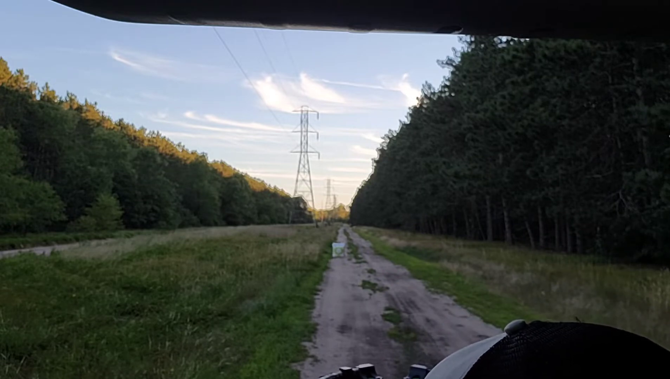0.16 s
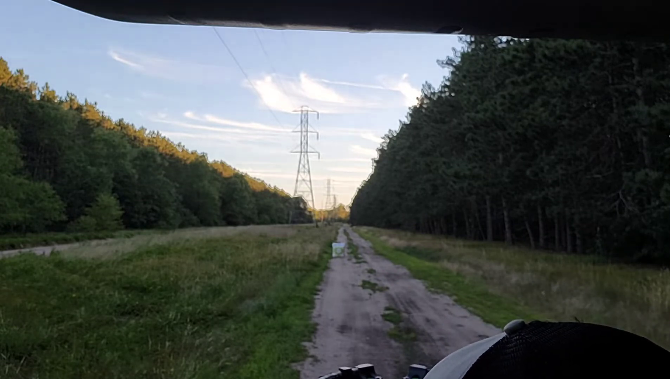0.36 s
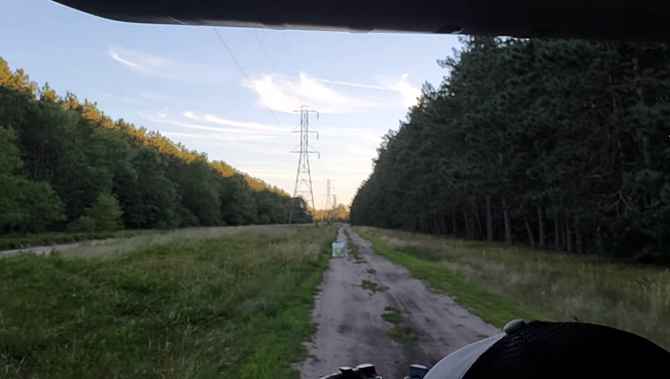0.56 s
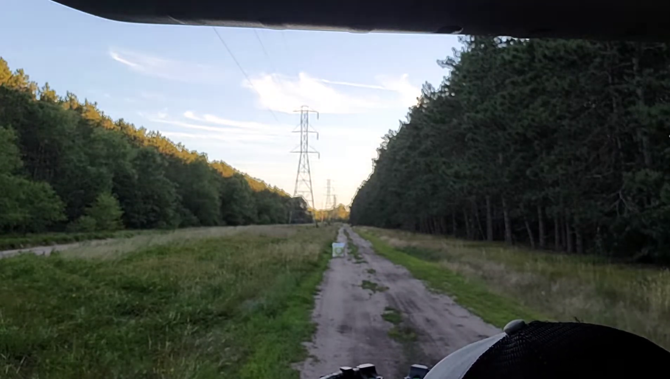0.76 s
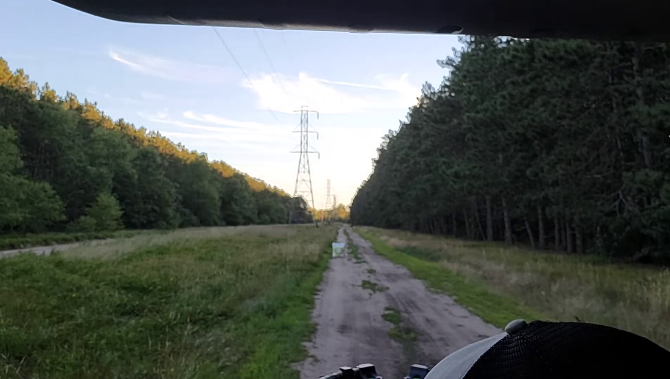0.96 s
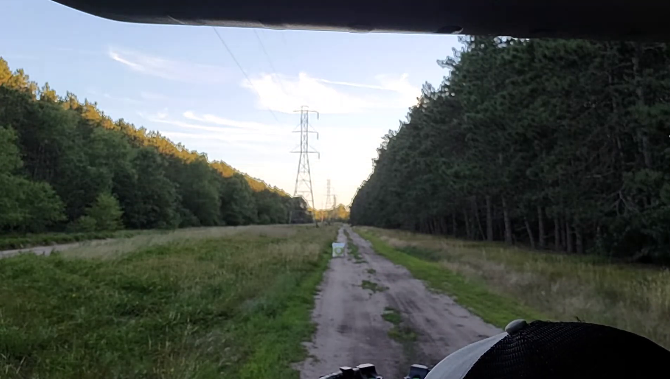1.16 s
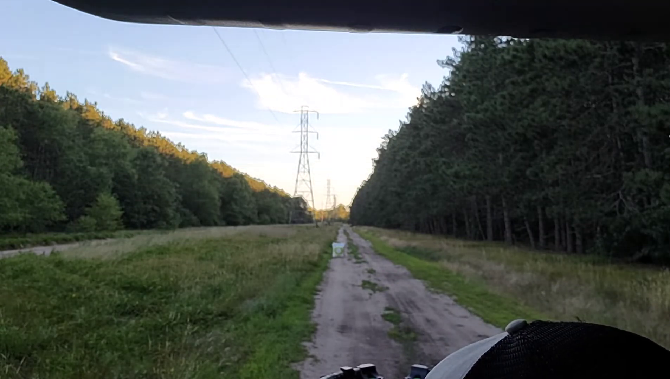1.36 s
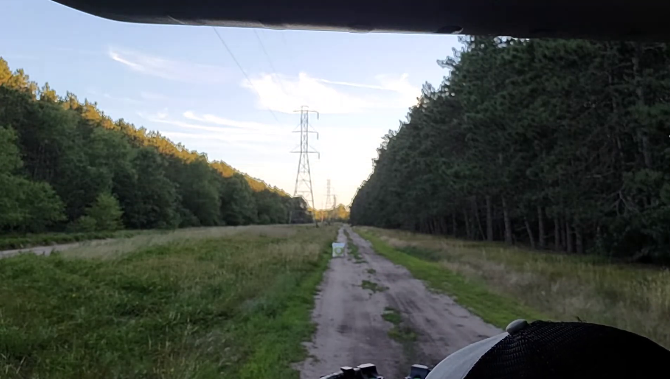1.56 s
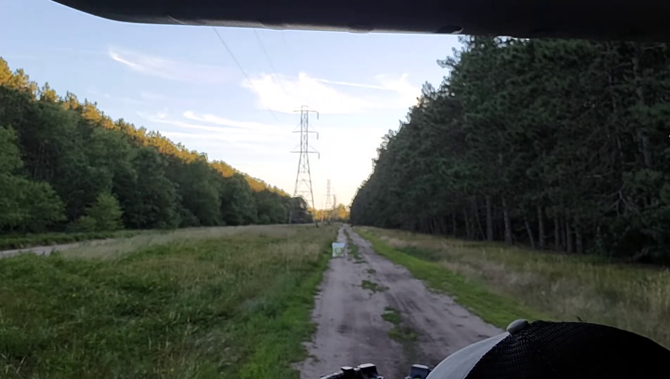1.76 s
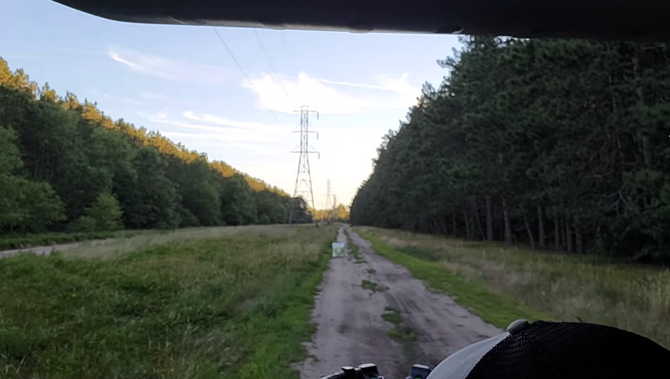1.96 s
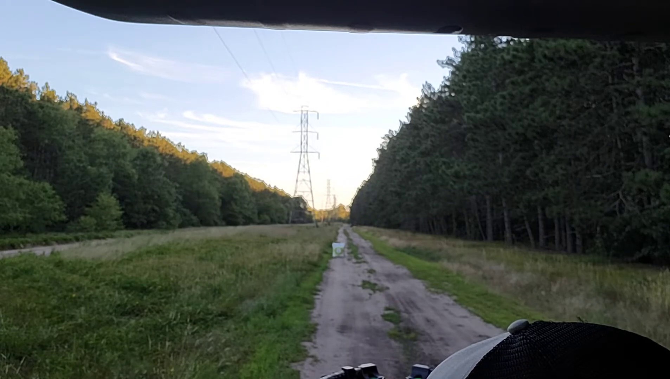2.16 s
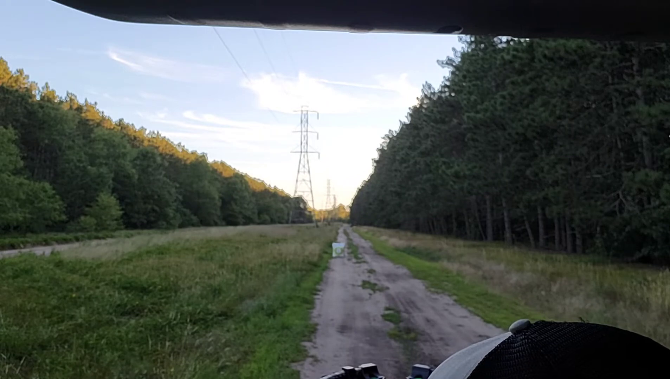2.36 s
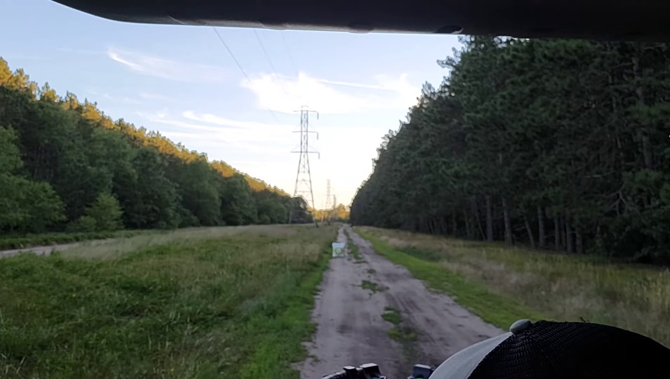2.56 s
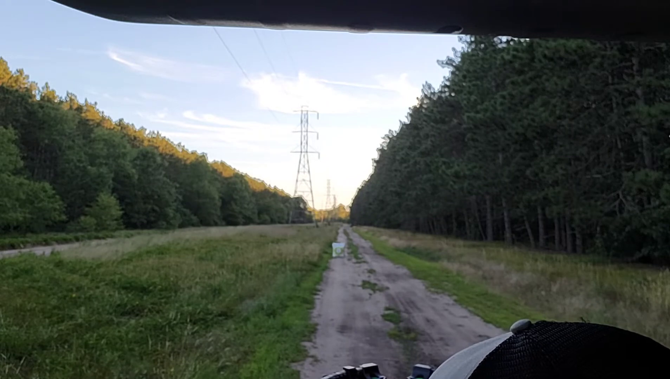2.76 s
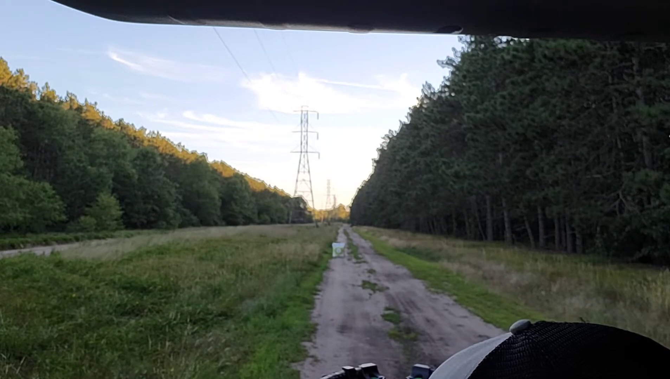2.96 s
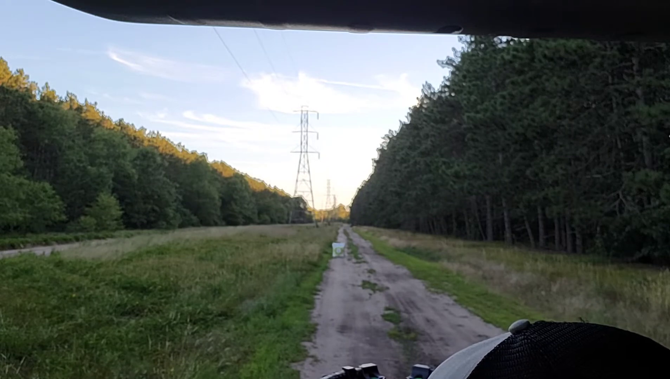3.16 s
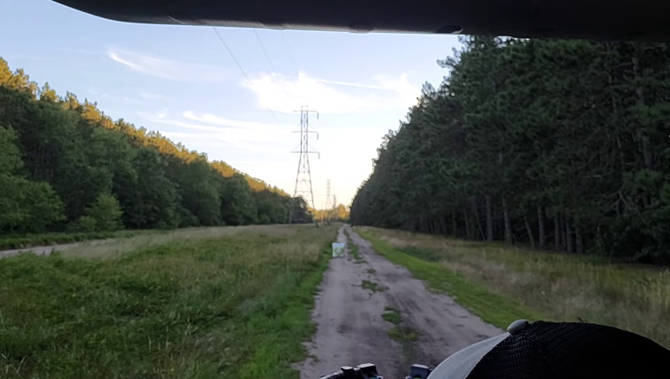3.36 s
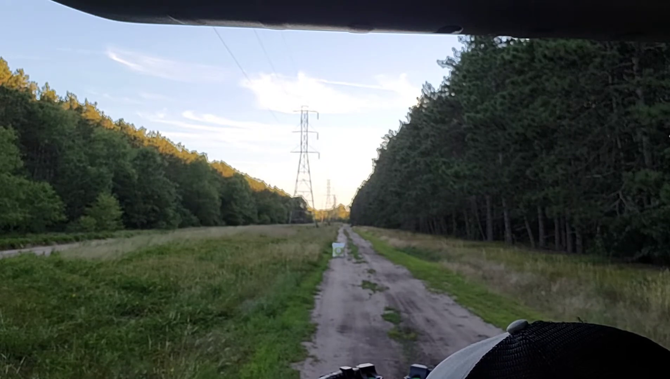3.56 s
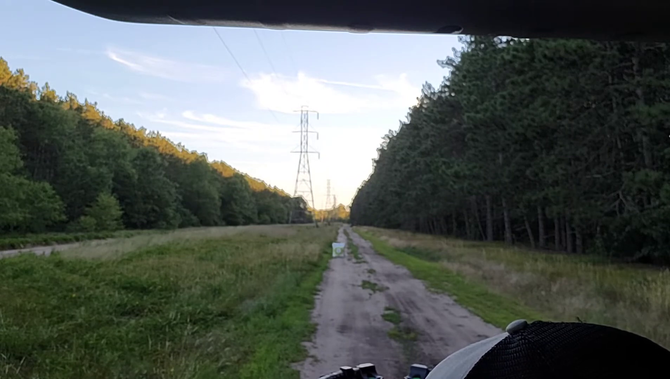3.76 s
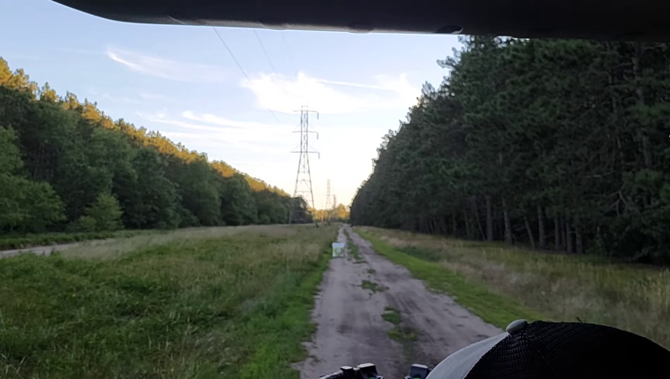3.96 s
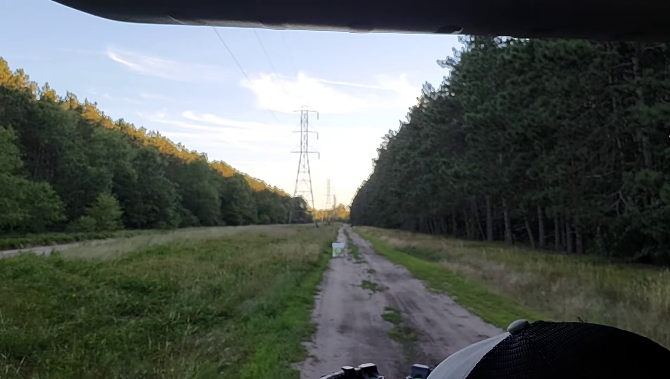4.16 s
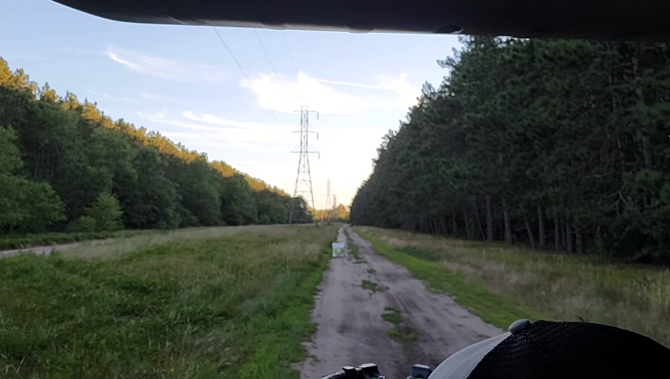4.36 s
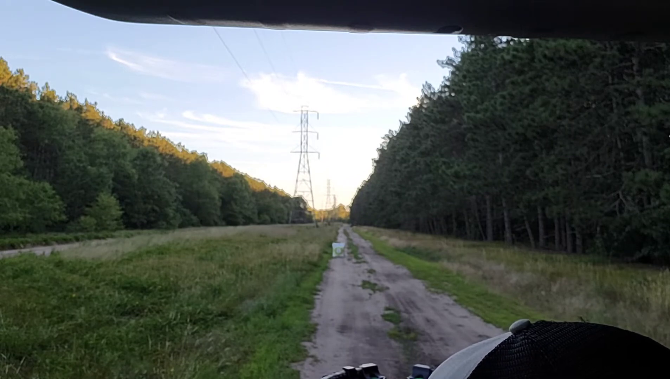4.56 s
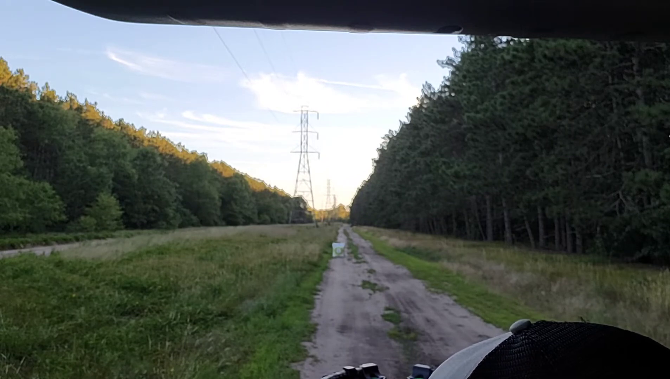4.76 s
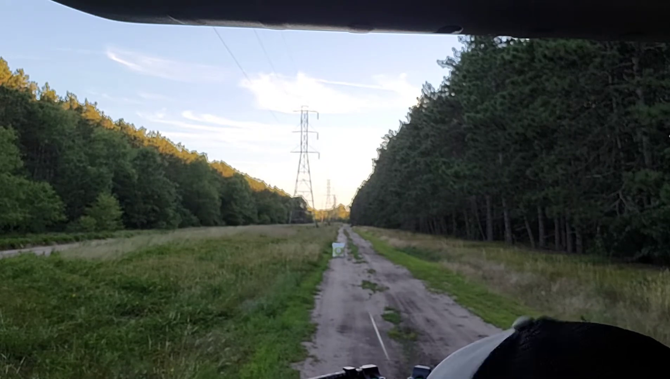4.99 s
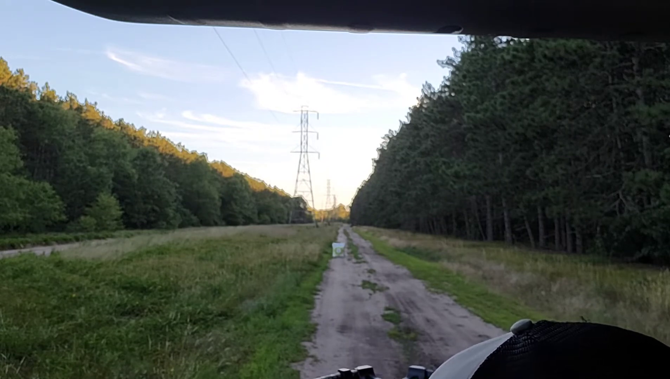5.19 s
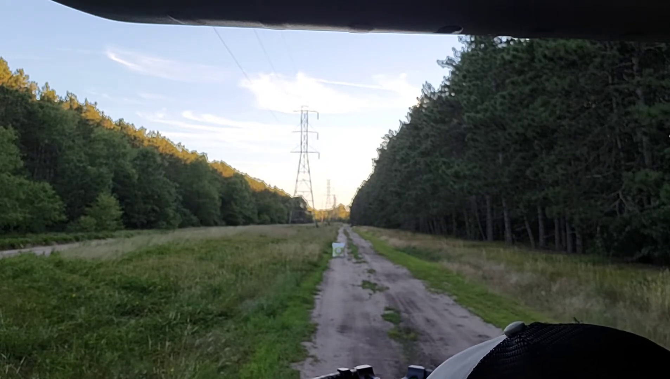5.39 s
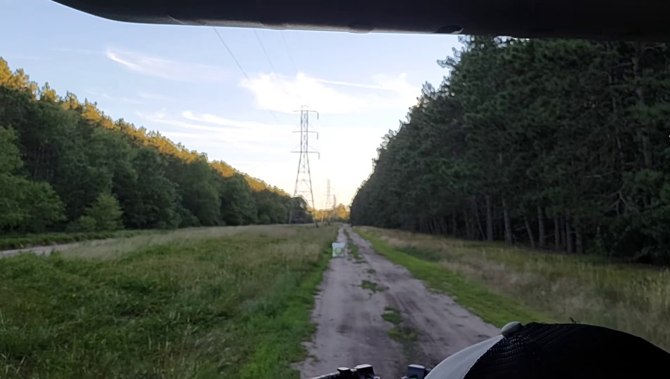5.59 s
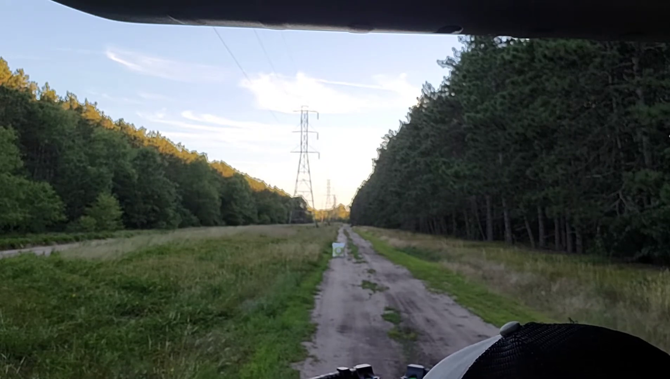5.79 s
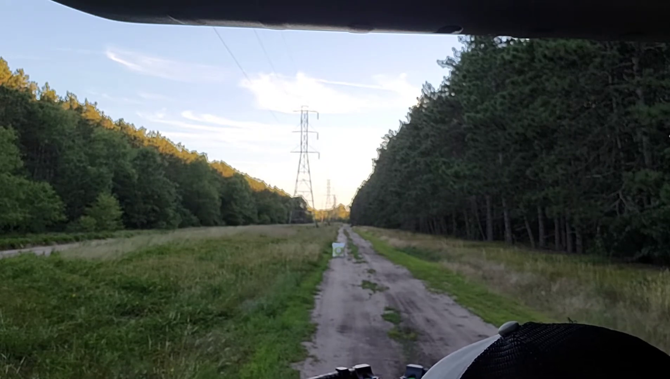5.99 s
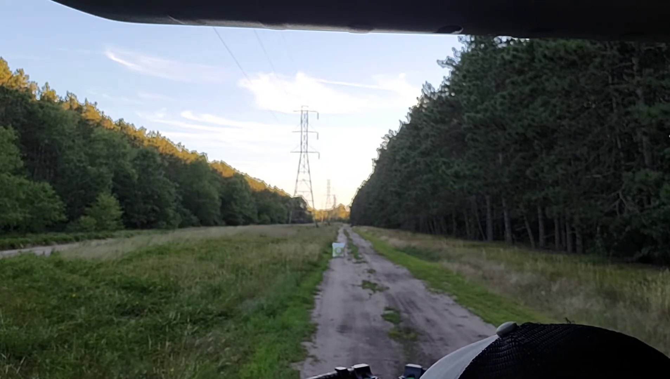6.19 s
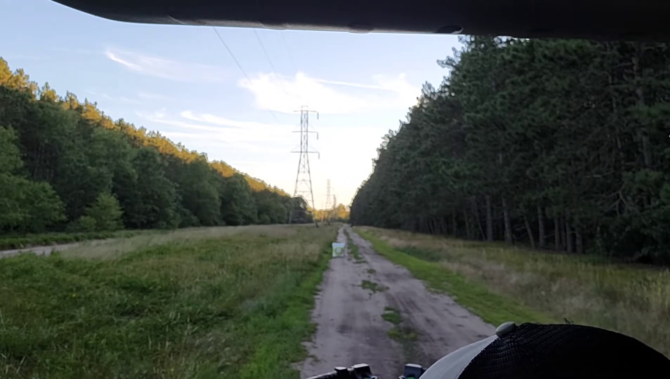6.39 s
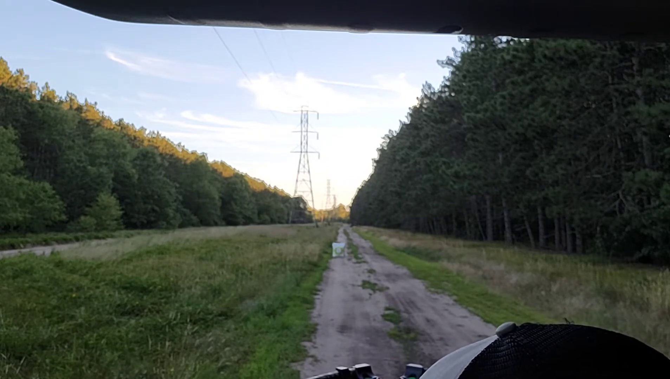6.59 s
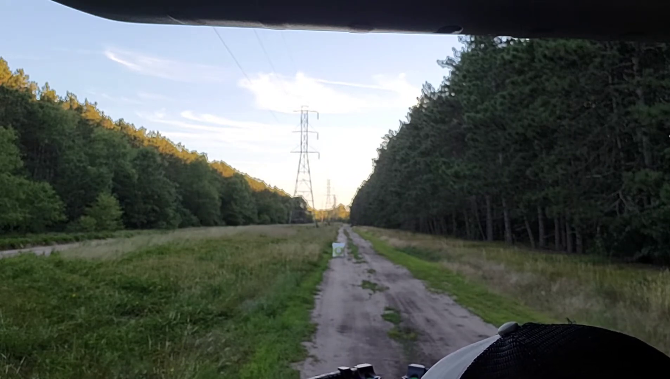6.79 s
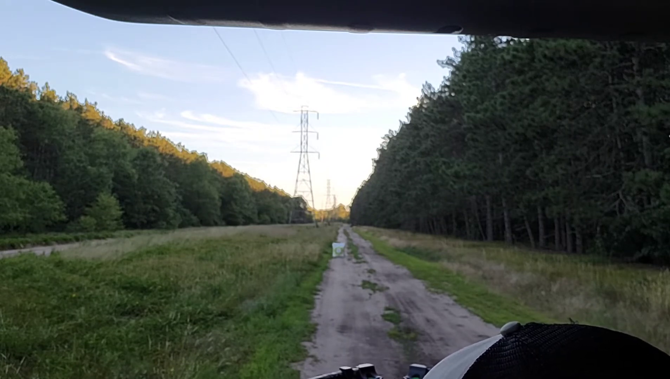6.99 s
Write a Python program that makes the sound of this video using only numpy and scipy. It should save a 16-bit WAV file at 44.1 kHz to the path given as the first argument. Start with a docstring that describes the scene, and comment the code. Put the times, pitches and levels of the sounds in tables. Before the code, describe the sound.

From the start, a parked off-road vehicle's two-cylinder engine idles outdoors, a low, puffing throb with a light metallic drone and valve clatter. It stays fairly quiet and wavers in strength, with a brief rasp at the opening and a few short ringing tones in the first second and a half. A cricket gives faint, high chirps at irregular intervals over a soft low rumble. Two tiny dry ticks come at about 2 and 4.2 seconds.

At 5 seconds a crossbow fires close by: a very loud, bright crack with a short twang and a slight thump. At about 5.3 seconds the bolt hits its target with a fainter, sharp click and splintery knock. Both cracks echo through the trees and fade over about a second. The background dips at the shot and creeps back after 6 seconds, with one more faint chirp near 6.8 seconds.

```python
"""On a sandy track between two walls of forest, a crossbow is shot from a parked off-road vehicle.
The two-cylinder engine idles, puffing through its exhaust and rattling, while a cricket rubs its wings.
About five seconds in, the string cracks against its stops. The bolt strikes 0.3 s later, and the trees
scatter both cracks back. An automatic volume control dips at the shot, waits a second and creeps back."""
import sys
import numpy as np
from scipy import signal
from scipy.fft import rfft, irfft, next_fast_len
from scipy.io import wavfile
from scipy.ndimage import uniform_filter1d, minimum_filter1d

SR = 44100
rng = np.random.default_rng(int(sys.argv[2]) if len(sys.argv) > 2 else 0)


def digitize_waveform(pressure):
    """Quantize a signal to 16-bit integers and store it at the path in sys.argv[1].

    Rows of a 2-D input are taken as channels; values are limited to [-1, 1].
    """
    field = np.atleast_2d(pressure).T
    bounded = np.clip(field, -1, 1)
    quanta = np.round(bounded * 32767).astype(np.int16)
    wavfile.write(sys.argv[1], SR, quanta)


N = 310196
TIME = np.arange(N) / SR
LEFT_RIGHT = np.array([[.5], [-.5]])   # shares a level gap: half up on the left, half down on the right

# The two microphones. Each row: frequency in Hz, how alike they sound (1 = same), left minus right in dB.
MICROPHONES = [(30.2, 0.45, 1), (90, 1, 2.5), (300, 0.92, 0.96), (693, 0.76, 2.5), (1280, 0.2, 6.5),
               (2330, 0.067, 1.5), (4350, 0.22, 0.9), (8050, .1, -0.5), (14000, 0.23, -2)]


def from_db(db):
    """Turn decibels (dB) into a number to multiply a sound by."""
    return 10 ** (np.asarray(db) / 20)


def rms_one(x):
    """Scale a sound so that its average strength (rms) is one."""
    return x / np.sqrt(np.mean(x ** 2) + 1e-20)


def at_hz(table, hz, column=1):
    """Read a table between its frequencies, giving every octave equal room."""
    rows = np.array(table, float)
    return np.interp(np.log(np.maximum(hz, 1)), np.log(rows[:, 0]), rows[:, column])


def over_time(curve):
    """Join rows of (seconds, value) with straight lines, one value for each sample."""
    return np.interp(TIME, *np.transpose(curve))


def decay(start, t60):
    """Jump to one at the start, then fade by 60 dB every t60 seconds."""
    age = TIME - start
    return (age >= 0) * 1000. ** -np.clip(age / t60, 0, 10)


def add(out, x, start):
    """Mix a short sound in at a start time in seconds."""
    at = round(start * SR)
    x = x[..., max(-at, 0):N - at]
    out[..., max(at, 0):max(at, 0) + x.shape[-1]] += x


def noise(tone, size=N):
    """Stereo noise with a given tone; left and right are alike in the bass, much less so in the treble."""
    padded = next_fast_len(size, True)
    hz = np.fft.rfftfreq(padded, 1 / SR)
    shared, opposite = rfft(rng.standard_normal((2, padded)))
    alike = np.clip(at_hz(MICROPHONES, hz), -1, 1)
    pair = np.sqrt(1 + alike) * shared + np.sqrt(1 - alike) * opposite * [[1], [-1]]
    return rms_one(irfft(pair * from_db(at_hz(tone, hz)), padded)[:, :size])


def knock(tone, size=8192):
    """The shortest sudden pulse that has a given tone."""
    log_gain = np.log(from_db(at_hz(tone, np.fft.rfftfreq(size, 1 / SR))))
    cepstrum = irfft(log_gain)   # folding this onto its first half packs the energy at the start
    cepstrum[1:size // 2] *= 2
    cepstrum[size // 2 + 1:] = 0
    return irfft(np.exp(rfft(cepstrum)))


def puff(tone, size=8192):
    """A smooth push of air with a given tone, rising the same way as it falls."""
    gain = from_db(at_hz(tone, np.fft.rfftfreq(size, 1 / SR)))
    return np.roll(irfft(gain), size // 2)


def repeat(firings, sound, mode="full"):
    """Play the same sound at every firing of the engine."""
    return rms_one(signal.fftconvolve(firings, sound, mode)[:N])


def cylinders(first_s=.0098, second_at=.575, second_db=-2.5, wobble_db=.6, jitter_s=.00015):
    """One spike for each firing: the second cylinder is weaker and fires just past mid-cycle."""
    # The idle sags very slightly. Each row: time in seconds, engine cycles per second.
    idle_speed = [(0, 23.535), (1.4, 23.515), (2.2, 23.44), (3.3, 23.335), (7, 23.32)]
    cycles = np.cumsum(over_time(idle_speed)) / SR
    firings = np.zeros(N)
    for phase, db in ((0, 0), (second_at, second_db)):
        due_s = np.interp(np.arange(phase, cycles[-1]), cycles, TIME)
        late, strong = rng.standard_normal((len(due_s), 2)).T
        at = ((first_s + due_s + jitter_s * late) * SR).astype(int)
        firings[np.clip(at, 0, N - 1)] = from_db(db + wobble_db * strong)
    return firings


def exhaust(firings, throb):
    """Each firing puffs gas through the muffler (a boom) and the pipe (a bark); both ring and rumble."""
    # The tone of each part. Each row: frequency in Hz, relative level in dB.
    muffler_tone = [(20, -37), (47, -17), (70, -9.5), (95, 2.5), (120, 2), (145, 7.5), (165, -5.5),
                    (200, -25.5), (3000, -115)]
    pipe_tone = [(80, -45.5), (185, -13.5), (215, 3.5), (240, 2), (280, -12), (330, -10), (400, -20.5),
                 (700, -50.5), (3000, -100)]
    # How loud each part is. Each row: time in seconds, level in dB.
    boom_level = [(0.0, -42), (1.23, -47), (1.45, -45), (2.35, -50.5), (2.74, -43.5), (3.26, -42),
                  (3.71, -43.5), (3.78, -51.5), (3.93, -46), (4.48, -45.5), (4.9, -51), (6.9, -46)]
    bark_level = [(0.0, -43.5), (0.18, -40), (0.93, -50.5), (2.37, -55), (2.59, -47.5), (3.04, -52.5),
                  (3.41, -44.5), (3.97, -58.5), (4.35, -49.5), (4.9, -52), (6.9, -50.5)]

    def blown(tone, loudness, ringing, rumble):
        puffs = repeat(firings, -puff(tone), "same")
        sound = puffs + ringing * repeat(firings, knock(tone)) + rumble * throb * noise(tone)
        return from_db(over_time(loudness)) * rms_one(sound)

    boom = blown(muffler_tone, boom_level, ringing=.21, rumble=.24)
    return boom + blown(pipe_tone, bark_level, ringing=.39, rumble=.51)


def opening_rasp(throb, rise_s=.017, sag_db_per_s=40, fade_from_s=.2):
    """A brief rasp that throbs with the engine as it swells, sags and dies away."""
    # The rasp's tone. Each row: frequency in Hz, relative level in dB.
    rasp_tone = [(700, -23), (1000, 2.5), (1400, -1.5), (1900, -8.5), (2200, -26), (6000, -59)]
    swell = np.minimum(TIME / rise_s, 1) * from_db(-55 - sag_db_per_s * TIME)
    fade = (TIME < fade_from_s) + decay(fade_from_s, t60=.38)
    return swell * fade * throb * noise(rasp_tone)


def case_and_valves(firings, throb):
    """Each firing shakes the metal: the engine case drones and the valves clatter."""
    # The tone of each part. Each row: frequency in Hz, relative level in dB.
    case_tone = [(250, -35), (420, -25.5), (490, -2), (520, -4), (555, 5), (590, -5), (655, -2.5),
                 (770, -26), (1100, -33), (3000, -88.5)]
    valve_tone = [(500, -32), (850, -4.5), (1020, 10), (1200, -8), (1400, -6), (1550, -16.5), (1750, -13),
                  (2300, -26), (6000, -73)]
    # How loud each part is. Each row: time in seconds, level in dB.
    case_level = [(0.0, -55.5), (0.61, -54.5), (1.18, -55.5), (1.45, -50.5), (1.65, -53), (2.77, -57),
                  (3.29, -51.5), (4.9, -60.5), (6.9, -60.5)]
    valve_level = [(0.35, -67.5), (0.41, -74.5), (1.67, -72.5), (2.81, -75.5), (3.35, -65), (4.01, -80),
                   (4.9, -74), (6.9, -83.5)]

    def shaken(tone, loudness, rough):
        sound = repeat(firings, -knock(tone)) + rough * throb * noise(tone)
        return from_db(over_time(loudness)) * rms_one(sound)

    return shaken(case_tone, case_level, rough=1.5) + shaken(valve_tone, valve_level, rough=1.4)


def case_singing(swell_s=.042):
    """Now and then the engine case sings out one short note."""
    # The notes. Each row: loudest moment in seconds, pitch in Hz, level in dB.
    notes = [(.55, 570, -47.5), (.695, 541, -52.5), (.955, 565, -51), (1.49, 656, -56), (1.55, 533, -51.5),
             (3.3, 560, -56.5)]
    out = np.zeros(N)
    for peak_s, hz, db in notes:
        age = TIME - peak_s
        out += from_db(db) * np.exp(-(age / swell_s) ** 2) * np.sin(2 * np.pi * hz * age)
    return np.sqrt(2) * out


def engine():
    """The firings drive the exhaust and shake the metal; the rough noises throb in step with them."""
    firings = cylinders()
    shake = np.convolve(decay(0, t60=.2)[:SR // 4], np.hanning(SR // 300))   # a jolt with a soft edge
    throb = repeat(firings, shake)
    return exhaust(firings, throb) + opening_rasp(throb) + case_and_valves(firings, throb) + case_singing()


def cricket(wing_hz=4790, step_hz=25, rise_hz=90, step_db=5, stroke_s=.05, gap_s=.046):
    """Three raspy wing strokes a chirp, each louder and a little higher; the trees throw them back."""
    # The chirps. Each row: time in seconds, level in dB that the strokes climb toward.
    chirps = [(-.10, -58.5), (0.632, -65), (1.176, -65), (1.908, -65.5), (2.283, -63.5), (3.279, -64.5),
              (4.005, -64), (4.405, -63.5), (6.793, -65)]
    out = np.zeros((2, N))
    along = np.linspace(0, 1, int(stroke_s * SR))
    for chirp_s, db in chirps:
        for k in range(3):
            hz = wing_hz + step_hz * k + rise_hz * (along - .5) + rng.normal(0, 12)
            stroke = np.sin(np.pi * along) ** 2 * np.sin(2 * np.pi * np.cumsum(hz) / SR)
            add(out, from_db(db + step_db * (k - 3)) * stroke, chirp_s + k * gap_s - stroke_s / 2)
    scrape = noise([(3500, -31.5), (4400, -8), (4800, 6), (5300, -7.5), (6500, -34.5)])
    out += from_db(-4) * np.abs(signal.hilbert(out)) * scrape   # the scrape follows each stroke's loudness
    trees = forest_echo(delay_s=.0029, spread_s=.08, tilt_db_per_octave=-3)
    trees *= decay(0, t60=1.4)[:trees.shape[1]]
    echo = from_db(-25) * signal.fftconvolve(out, trees, axes=1)[:, :N]
    add(echo, from_db(-14) * out, start=.095)   # one clear bounce off the forest edge
    return out + echo


def forest_echo(delay_s, spread_s, tilt_db_per_octave, size=65536):
    """The echo of one crack: far trunks answer more weakly, and the air takes the treble first."""
    # Sound scattered by the trees. Each row: frequency in Hz, relative level in dB, t60 in seconds.
    bands = [(200, -2, 1.6), (590, 6, 1.6), (840, -3, 2.4), (2100, 0.5, 2.82), (2700, 1, 1.7),
             (3300, 0, 1.3), (4360, -4, 1.05), (6220, -3, .84), (7640, 3, .85), (8705, -11.5, .88),
             (13150, -2, .55), (16000, -4, .35)]
    # The nearer wall of trees is on the right. Each row: frequency in Hz, left minus right in dB.
    lean = [(600, 0), (1200, -4), (5000, 0.5), (13000, -6)]
    age = np.maximum(TIME[:size] - delay_s, 0)
    spreading = (1 - np.exp(-age / .008)) / (1 + age / spread_s)
    hz = np.fft.rfftfreq(size, 1 / SR)
    white = rfft(noise([(20, 0), (20000, 0)], size))
    echo = 0
    for k, (centre_hz, db, t60) in enumerate(bands):
        band = at_hz([(row[0], j == k) for j, row in enumerate(bands)], hz)   # 1 here, 0 at the others
        tilt_db = tilt_db_per_octave * np.log2(centre_hz / 4000)
        gain = from_db(db + tilt_db + at_hz(lean, centre_hz) * LEFT_RIGHT)
        echo += gain * irfft(white * band) * 1000. ** (-age / t60)
    return echo * spreading


def air():
    """A faint, steady background of low rumble and hiss."""
    # The background's tone. Each row: frequency in Hz, relative level in dB.
    air_tone = [(31, 24), (45, 48), (65, 39), (270, 37.5), (800, 14), (2000, -2), (6000, -7), (7500, -5.5),
                (9000, -8), (16000, 0)]
    return from_db(-55.5) * noise(air_tone)


def handling():
    """Handling makes two tiny dry ticks."""
    # The ticks. Each row: start in seconds, level in dB.
    ticks = [(1.995, -68), (4.161, -65)]
    return sum(from_db(db) * decay(start, t60=.015) for start, db in ticks) * noise([(5000, 2), (15000, -3)])


def crossbow(release_s=5.0268, slide_s=.0075, recoil_s=5.04, recoil_hz=60.4, lean_left_db=1):
    """The string rasps along the rail, slams into its stops and rebounds; the recoil thumps the stock."""
    # The string hits its stops, then bounces. Each row: start in seconds, rasp in dB,
    # blow to the bow's limbs (its springy arms) in dB, brightness of that blow in Hz.
    contacts = [(5.0348, -1.5, -4, 2197), (5.0384, -2.5, -11, 4000), (5.0427, 1, -17, 2000),
                (5.052, -11, -19, 600), (5.0572, -17, -18, 600.2)]
    # The tone of the string's rasp. Each row: frequency in Hz, relative level in dB.
    snap_tone = [(88, -36), (160, -26), (450, -2.5), (589, 0), (854, -18), (1020, -7.5), (1480, -9),
                 (1950, -1), (2350, -8.5), (2800, -11), (3900, -5), (5460, -11.5), (7400, -1.5),
                 (9260, -18.5), (13800, -1.5), (16000, -20)]
    # The notes of the limbs and stock. Each row: pitch in Hz, relative level in dB, t60 in seconds.
    limb_notes = [(208, -9, .11), (310, -4, 0.07), (355, -3, .07), (420.2, -8, 0.069), (569.6, -5, .07),
                  (790, -21, .06), (1030, -9, .05), (1260, -15, .05), (1700, -7, .045), (1978, -9, .05),
                  (2320, -12, .035)]
    along_rail = np.clip((TIME - release_s) / slide_s, 0, 1)
    rasp = np.sqrt(np.abs(np.sin(np.pi * along_rail)))
    for start, rasp_db, _, _ in contacts:
        buzz = from_db(-22) * decay(start, t60=.14)
        rasp += from_db(rasp_db) * (decay(start, t60=.032) + buzz)
    recoil = from_db(-24.5) * decay(recoil_s, t60=.2) * np.sin(2 * np.pi * recoil_hz * (TIME - recoil_s))
    out = rasp * noise(snap_tone) + twang() + recoil
    for start, _, blow_db, bright_hz in contacts:
        add(out, from_db(blow_db) * ring(limb_notes, bright_hz), start)
    out *= from_db(lean_left_db * LEFT_RIGHT)
    add(out, from_db(-20.5) * forest_echo(delay_s=.06, spread_s=.047, tilt_db_per_octave=1.43), release_s)
    return out


def ring(notes, bright_hz=SR, size=8192, bass_cut_hz=170, skew_s=.00008):
    """A struck object rings at its own notes, weakly above bright_hz, and gives off little bass."""
    hz, db, t60 = np.transpose(notes)[:, :, None]
    age = TIME[:size]
    strength = from_db(db + rng.standard_normal(db.shape)) / np.hypot(1, (hz / bright_hz) ** 2)
    fading = strength * 1000. ** (-age / t60)
    lead_s = skew_s * (-1) ** np.arange(len(hz))[:, None]   # the notes reach left or right first, in turn
    side_ages = [np.maximum(age + side * lead_s - skew_s, 0) for side in (1, -1)]
    motion = [np.sum(fading * np.sin(2 * np.pi * hz * t), axis=0) for t in side_ages]
    return signal.sosfilt(signal.butter(4, bass_cut_hz, "high", fs=SR, output="sos"), motion)


def twang(peak_s=5.055, swell_s=.008, pitch_hz=580, rise_hz_per_s=2000, left_lead_s=.00016):
    """The stopped string swings up, rings briefly and rises in pitch as it settles."""
    age = TIME - peak_s
    loudness = np.where(age < 0, np.exp(-(age / swell_s) ** 2), decay(peak_s, t60=.07))
    cycles = pitch_hz * (age + np.array([[left_lead_s], [0]])) + rise_hz_per_s * age ** 2 / 2
    return from_db(-8) * loudness * np.sin(2 * np.pi * cycles)


def bolt_strike(hit_s=5.3334, echo_peak_s=.023):
    """The bolt lands with a sharp click, brief splintering and a knock; nearby trees answer at once."""
    # The tones of the strike and of its first echo. Each row: frequency in Hz, relative level in dB.
    strike_tone = [(88, -35), (150, -21), (534, 0.5), (854, -12.5), (1240, -2.5), (1560, -8.5), (2870, -3),
                   (5050, -8.5), (6390, -5.5), (7400, 4), (8560, -3), (10400, 0), (13500, -4),
                   (16000, -8.5)]
    near_tree_tone = [(150, 0), (700, -21), (2400, 6.5), (5000, -16), (7400, 1.5), (9500, -5), (13000, -5),
                      (16000, -26)]
    # The notes of the struck target. Each row: pitch in Hz, relative level in dB, t60 in seconds.
    target_notes = [(216.4, -19.5, 0.078), (363, -19.5, .03), (542, -12, .022), (1140, -13, .016),
                    (7500, -17, .007)]
    splinters = from_db(-11) * decay(hit_s, t60=.027)
    out = (decay(hit_s, t60=.007) + splinters) * noise(strike_tone)
    click = knock(strike_tone)
    add(out, from_db(10) * click / np.abs(click).max() + ring(target_notes), hit_s)
    add(out, from_db(-25) * forest_echo(delay_s=.0019, spread_s=.053, tilt_db_per_octave=.5), hit_s)
    progress = np.maximum(TIME - hit_s, 0) / echo_peak_s
    swell = progress * np.exp(1 - progress)   # the echo from the trunks beside the target
    return out + from_db(-34) * swell * noise(near_tree_tone)


def scene():
    """All the sounds together, with a slightly different tone in each microphone."""
    dry = engine() + crossbow() + bolt_strike() + cricket() + handling() + air()
    size = next_fast_len(N + SR // 10, True)
    lean_db = at_hz(MICROPHONES, np.fft.rfftfreq(size, 1 / SR), column=2)
    return irfft(rfft(dry, size) * from_db(lean_db * LEFT_RIGHT), size)[:, :N]


def housing(x, dip_hz=810, depth=.32):
    """The microphone housing swallows part of a narrow band of sound."""
    return x - depth * signal.lfilter(*signal.iirpeak(dip_hz, Q=2.9, fs=SR), x)


def record(dry, limit_db=-12.5, hold_s=1.0, recover_db_per_s=14.5, ceiling=.72, cutoff_hz=15780):
    """The volume control dips, holds and creeps back; peaks are rounded and the top treble is cut."""
    power = uniform_filter1d(np.mean(dry ** 2, axis=0), size=1400)
    over_db = np.maximum(10 * np.log10(np.maximum(power, 1e-12)) - limit_db, 0)
    half_hold = int(hold_s * SR) // 2
    held_db = -minimum_filter1d(-over_db, 2 * half_hold + 1, origin=half_hold)   # highest in the last hold_s
    recovery_db = recover_db_per_s * TIME
    dip_db = np.maximum.accumulate(held_db + recovery_db) - recovery_db
    early_dip_db = np.interp(TIME + .012, TIME, dip_db)   # acts 12 ms ahead
    out = ceiling * np.tanh(housing(dry) * from_db(-early_dip_db) / ceiling)
    return signal.sosfilt(signal.ellip(10, .1, 80, cutoff_hz, fs=SR, output="sos"), out)


dry = scene()
out = record(dry)
digitize_waveform(out)
```